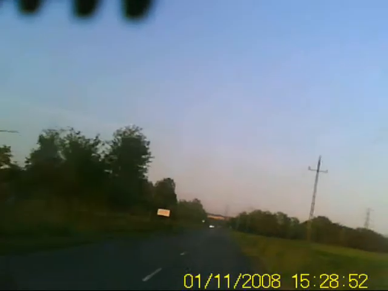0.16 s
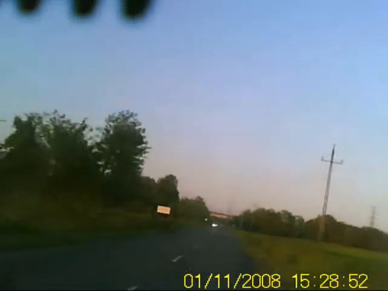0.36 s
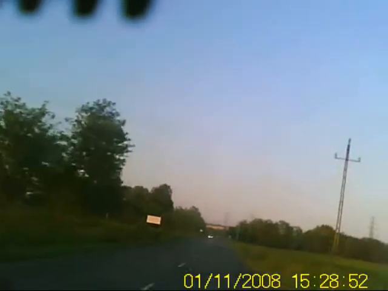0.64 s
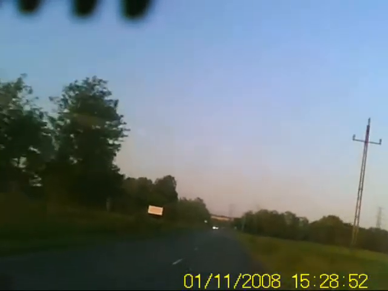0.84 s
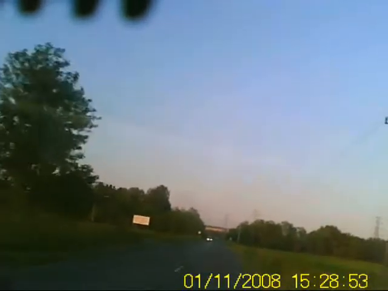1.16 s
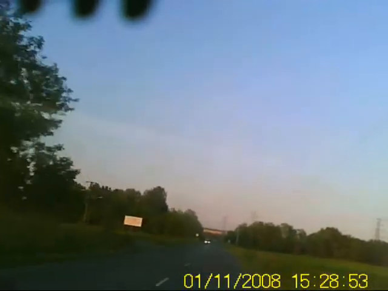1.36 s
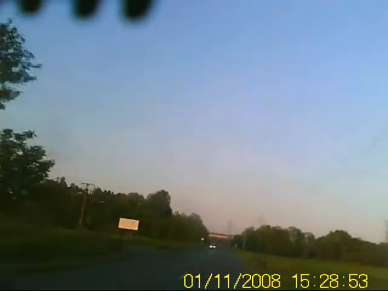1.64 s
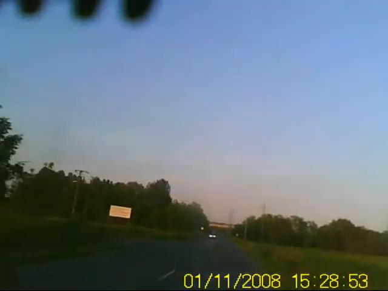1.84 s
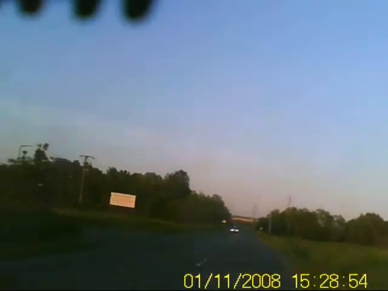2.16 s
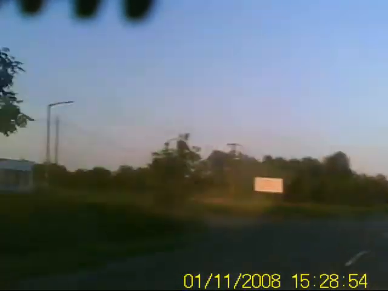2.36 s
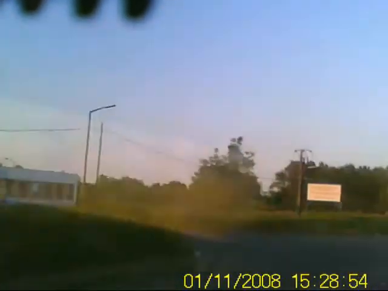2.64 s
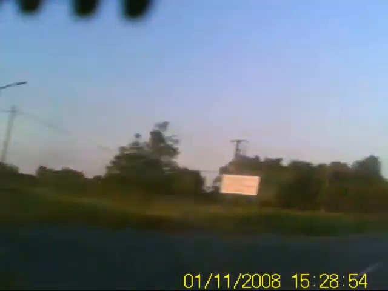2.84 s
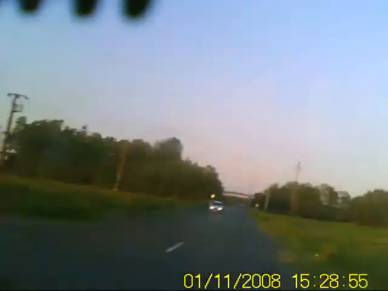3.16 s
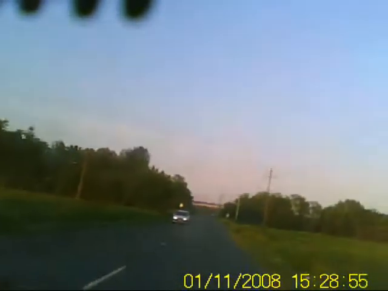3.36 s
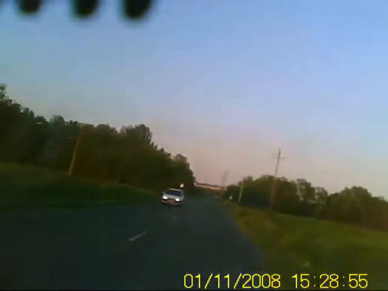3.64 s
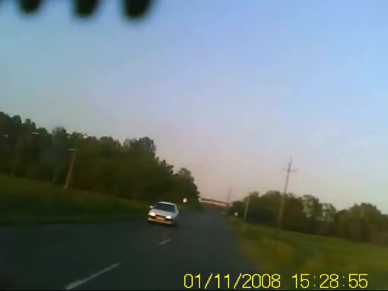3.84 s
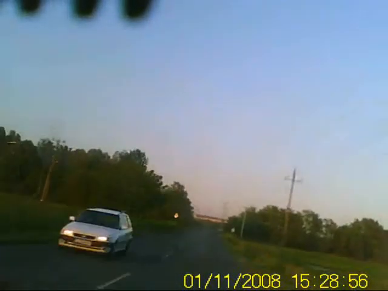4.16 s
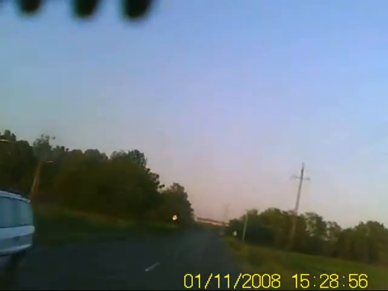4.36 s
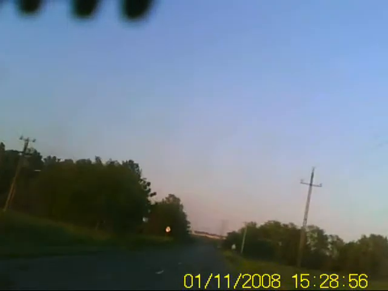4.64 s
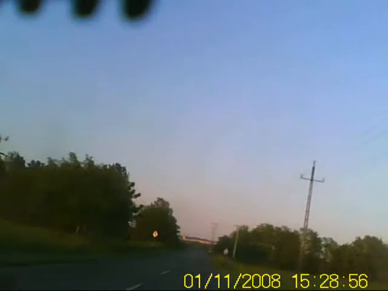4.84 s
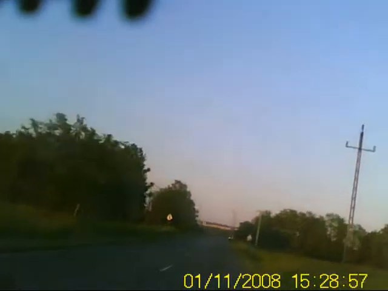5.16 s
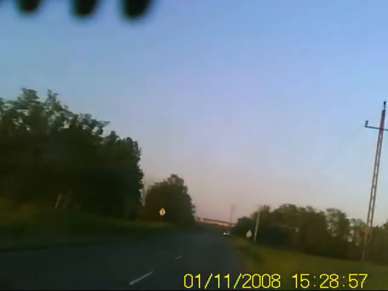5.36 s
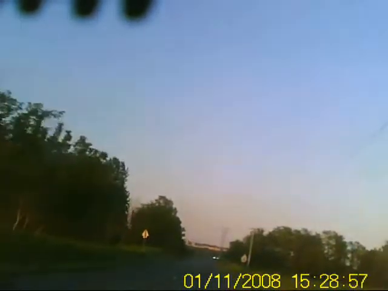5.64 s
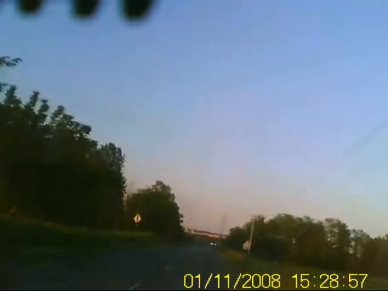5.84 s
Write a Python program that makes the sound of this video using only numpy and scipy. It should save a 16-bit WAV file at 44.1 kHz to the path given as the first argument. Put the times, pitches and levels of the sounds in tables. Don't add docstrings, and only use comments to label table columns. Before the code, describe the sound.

A motorcycle cruises outdoors, heard through a small, rough microphone inside the rider's helmet. Deep wind rumble dominates throughout, with drone, airy roar and faint hiss, and fast clusters of low thumps, about twenty-two a second, that squash and pump everything else. The engine sings steadily around 163 Hz, creeping up to about 168 Hz by 5 s, with a gear whirr and faint constant electronic whine. Low knocks from road joints come at 0.35 and 1.1 s. The engine's upper tone thins near 0.9 s, then strengthens to fullest around 3 s, when a thin valve whistle emerges. A quick roadside roar swells at 2.7 s, followed by a slower hissy one at 3.5 s. A car passes around 4.1 s with a roar that stops abruptly into a gap. Wind lulls near 4.75 s, a short swish follows at 4.9 s, gusts peak at 5.3 s, and another roar rises at the end.

```python
import sys
import numpy as np
from scipy import signal
from scipy.fft import rfft, irfft
from scipy.io import wavfile
from scipy.ndimage import uniform_filter1d

SR = 44100
rng = np.random.default_rng(int(sys.argv[2]) if len(sys.argv) > 2 else 0)


def wav_out(sig):
    wavfile.write(sys.argv[1], SR, np.round(np.clip(np.atleast_2d(sig).T, -1, 1) * 32767).astype(np.int16))


def voltage_ratio(level):
    return 10 ** (np.asarray(level, float) / 20)


N = 264159

# (frequency [Hz], level [dB per Hz])
RUMBLE_COLOUR = [(3, 0), (10, -6), (20, -1), (32, -3.5), (50, -6), (80, -9), (130, -16.5), (200, -23.5),
                 (300, -51.5), (600, -83.5)]
DRONE_COLOUR = [(70, -5.5), (140, -4), (200, 0), (280, -3), (400, -7), (560, -16.5), (900, -38.5),
                (1500, -62.5)]
ROAR_COLOUR = [(200, -19), (500, -3), (800, 1), (1150, -2.5), (1600, -2.5), (2200, -7.5), (2850, -10.5),
               (3500, -21.5), (5000, -42)]
HISS_COLOUR = [(2000, -26), (3200, -3), (4000, -2), (5500, -3.5), (7000, -4), (8500, -3.5), (9600, -8),
               (10400, -14), (11000, -18), (11400, -57)]
ROADSIDE_COLOUR = [(200, -16), (400, 1), (560, 1.5), (750, 0.5), (1000, -9.5), (1400, -14.5), (2500, -66)]
# (time [s], gust [dB])
GUSTS = [(0, -2), (.2, -2.5), (.4, 1), (.6, 2), (.8, -1.5), (1.2, 0), (1.6, 2), (1.9, -2), (2.5, 3),
         (2.9, -1.5), (3.4, 2.5), (4.06, 2), (4.16, -0.5), (4.35, -2), (4.75, -5), (5.3, 3.5), (5.55, -2),
         (5.99, 1)]
# (closest [s], approach [s], leave [s], low roar lift [dB], tyre hiss lift [dB])
PASSES = [
    (1.3, 0.34, 0.17, -1.5, 1),
    (2.7, .2, 0.11, 8.5, 0.1),
    (3.5, 0.54, 0.17, 1, 2),
    (4.11, 0.27, 0.017, 6.5, 3),
    (4.25, 0.11, 0.24, -5.5, 0),
    (4.7, .1, .08, -3, -1.5),
    (4.9, 0.11, 0.092, 2.5, 2.5),
    (5.9, 0.24, .3, 3.5, 2),
]
# (time [s], rate [Hz])
FIRING = [
    (0.0, 162.62),
    (1.5, 163.9),
    (2.0, 164.66),
    (5.0, 168.03),
    (5.99, 167.97),
]
EXHAUST_ORDERS = [1, 2, 3.5, 3.75, 6, 8, 10, 11, 11.25, 21.5, 22]
EXHAUST_DB = [-39, -39.5, -64.5, -64, -78.5, -69, -67.5, -79, -96, -93, -85]
GEAR_ORDERS = [3.6415, 4.344, 6.312, 12.624, 14.566]
GEAR_DB = [-52.5, -72, -60.5, -76, -68.5]
LOAD_ORDERS = [3, 7.283, 22.5]
# (time [s], load [0-1])
THROTTLE = [
    (0, 0.5),
    (.9, .05),
    (1.6, 0.46),
    (2.3, 0.6),
    (2.7, 0.9),
    (3.1, 0.99),
    (3.7, 0.74),
    (4.4, 0.8),
    (5.1, .55),
    (5.99, .58),
]
# (time [s], onset [s], recovery [s], level [dB])
SLACK = [
    (0.05, .3, .45, -15),
    (2.7, 0.51, .22, -17),
    (4.4, 0.23, .3, -1.5),
]
# (time [s], level [dB])
VALVES = [
    (0, -86),
    (2.75, -86),
    (3.05, -73),
    (3.9, -74),
    (4.3, -79),
    (5.99, -81),
]
# (frequency [Hz], level [dB])
WHINES = [(3893, -80), (5599, -77), (6200, -95), (7402, -78), (9598, -93), (10637, -100)]
# (first [s], last [s], first depth [dB], last depth [dB], width [ms])
RUNS = [(0.062, 0.142, -13.5, -20, 8), (0.321, 0.363, -16, -12.5, 5), (0.431, 0.558, -17, -12, 18.4),
        (0.635, 0.759, -18, -17.5, 18), (0.847, 0.935, -8, -16.5, 10.2), (1.019, 1.107, -14.5, -9.5, 13),
        (1.152, 1.238, -16.5, -14.5, 8.7), (1.31, 1.483, -14.5, -14.5, 13), (1.52, 1.646, -18, -10, 15),
        (1.696, 1.753, -11.5, -9.5, 9.9), (1.881, 2.071, -12, -7.5, 11), (2.19, 2.223, -16.5, -20.5, 12),
        (2.476, 2.503, -12.5, -12.5, 6.1), (2.556, 2.59, -18.5, -14.5, 5.6),
        (3.289, 3.335, -17.5, -18.5, 19), (3.982, 4.102, -17.5, -7.5, 10.5), (4.159, 4.205, -12, -15, 11),
        (4.269, 4.393, -11, -16, 8.3), (4.831, 4.93, -11.5, -19.5, 13), (4.961, 5.088, -12, -14, 14),
        (5.258, 5.345, -13, -19, 17), (5.436, 5.568, -18.5, -9.5, 7.5), (5.736, 5.834, -12.5, -15.5, 9.9),
        (5.877, 5.958, -9.5, -17, 7.9)]
# (time [s], depth [dB], width [ms])
STRAYS = [(0.258, -12.5, 4.8), (0.278, -27, 14), (1.808, -12, 24), (2.32, -17, 5.9), (2.386, -21, 11),
          (2.415, -30, 6.8), (2.686, -17, 15), (2.796, -20, 22), (2.848, -15.5, 5.2), (3.014, -20, 11),
          (3.08, -28, 5.2), (3.21, -18, 13), (3.404, -16, 19), (3.431, -9.5, 9.3), (3.461, -12.5, 17),
          (3.501, -15, 29), (3.565, -11.5, 15), (3.637, -23.5, 26), (3.718, -24.5, 13), (3.924, -17, 26),
          (4.512, -21.5, 7.5), (4.643, -16.5, 6.7), (4.747, -15.5, 6.4), (5.185, -14.5, 3.9),
          (5.37, -19, 8.7), (5.63, -15.5, 7.2), (5.659, -15, 6)]
# (time [s], peak [dB], pitch [Hz], time to fall 60 dB [s])
KNOCKS = [
    (0.344, -17, 154, 0.13),
    (1.097, -18.5, 242, 0.13),
    (5.912, -31.5, 278, 0.086),
]


def evened(x):
    return x / np.sqrt(np.mean(x ** 2) + 1e-20)


def curve(rows):
    s, *columns = np.transpose(rows)
    return [np.interp(np.arange(N) / SR, s, c) for c in columns]


def bumps(rows):
    t = np.arange(N) / SR
    total = 0
    for s, before, after, *lift_db in rows:
        swell = np.exp(-0.5 * ((t - s) / np.where(t < s, before, after)) ** 2)
        total = total + np.outer(lift_db, swell)
    return total


def drift(top_hz):
    hz = np.fft.rfftfreq(N, 1 / SR)
    slow = (hz > 0) / (1 + (hz / top_hz) ** 4)
    return evened(irfft(rfft(rng.standard_normal(N)) * slow, N))


def turbulence(colour, size, patchy_db, flicker_db, flicker_hz):
    hz = np.fft.rfftfreq(size, 1 / SR)
    a, b, patches = rng.standard_normal((N * 4 // size + 8, len(hz), 3)).T
    patches = uniform_filter1d(patches, size=8, axis=0)
    patches = evened(uniform_filter1d(patches, size=10, axis=1))
    f, db = np.transpose(colour)
    colour_db = np.interp(np.log(hz + 1), np.log(f + 1), db)[:, None]
    spectra = (a + 1j * b) * voltage_ratio(colour_db + patchy_db * patches)
    x = signal.istft(spectra, nperseg=size, noverlap=size * 3 // 4)[1][size:size + N]
    return evened(x * voltage_ratio(flicker_db * drift(flicker_hz)))


def wind():
    gust_db = curve(GUSTS)[0]
    passing_db, tyres_db = bumps(PASSES)
    rumble_db = -21.5 + 0.93 * gust_db
    drone_db = -32 + 0.17 * gust_db + 0.22 * passing_db
    roar_db = -45.5 + 0.19 * gust_db + 0.5 * tyres_db
    hiss_db = -62 + 0.16 * gust_db + tyres_db
    rumble = turbulence(RUMBLE_COLOUR, size=8192, patchy_db=0.5, flicker_db=1.35, flicker_hz=46.0)
    drone = turbulence(DRONE_COLOUR, size=2048, patchy_db=0.44, flicker_db=1.6, flicker_hz=7.4)
    roar = turbulence(ROAR_COLOUR, size=1024, patchy_db=0.0, flicker_db=0.36, flicker_hz=25.0)
    hiss = turbulence(HISS_COLOUR, size=512, patchy_db=0.8, flicker_db=0.54, flicker_hz=25.0)
    return voltage_ratio(rumble_db) * rumble + voltage_ratio(drone_db) * drone + voltage_ratio(roar_db) * roar + voltage_ratio(hiss_db) * hiss


def tones(turns, orders, levels_db, waver_db, jitter):
    total = 0
    for order, db in zip(orders, levels_db):
        level = voltage_ratio(db + waver_db * drift(32.0)) * np.sqrt(2)
        phase = 2 * np.pi * (order * turns + rng.random()) + jitter * drift(7.3)
        total = total + level * np.sin(phase)
    return total


def engine():
    turns = np.cumsum(curve(FIRING)[0]) / SR
    exhaust = tones(turns, EXHAUST_ORDERS, EXHAUST_DB, waver_db=0.5, jitter=0.06)
    gears = tones(turns, GEAR_ORDERS, GEAR_DB, waver_db=1.1, jitter=0.16)
    third_db = -73 + 23.5 * curve(THROTTLE)[0]
    mesh_db = -59.5 + bumps(SLACK)[0]
    valves_db = curve(VALVES)[0]
    changing = tones(turns, LOAD_ORDERS, [third_db, mesh_db, valves_db], waver_db=1.0, jitter=0.15)
    return exhaust + gears + changing


def whine():
    t = np.arange(N) / SR
    total = 0
    for hz, db in WHINES:
        total = total + voltage_ratio(db + 1.0) * np.sqrt(2) * np.sin(2 * np.pi * hz * t + 0.93 * drift(4.4))
    return total


def roadside():
    level_db = -48 + 0.3 * curve(GUSTS)[0] + bumps(PASSES)[0]
    roar = turbulence(ROADSIDE_COLOUR, size=2048, patchy_db=2.0, flicker_db=0.7, flicker_hz=22.0)
    return voltage_ratio(level_db) * roar


def shed():
    shed_per_s, slip_ms, depth_spread_db, width_spread = 23, 1.0, 0.5, 0.1
    rows = []
    for first, last, first_db, last_db, width_ms in RUNS:
        u = np.linspace(0, 1, round((last - first) * shed_per_s) + 1)
        a, b, c = rng.standard_normal((10, 3))[:len(u)].T
        s = first + u * (last - first) + slip_ms / 1000 * a * (u % 1 > 0)
        depth_db = first_db + u * (last_db - first_db) + depth_spread_db * b
        rows += zip(s, depth_db, width_ms * np.exp(width_spread * c))
    return rows


def buffets():
    rebound, rebound_ms, rebound_wide_ms = 0.65, 20, 7.1
    slow_release = 1.55
    dip_shape = 1.81
    out = np.zeros(N + 6000)
    ms = np.arange(-3000, 3000) * 1000 / SR
    swells = np.exp(-0.5 * ((abs(ms) - rebound_ms) / rebound_wide_ms) ** 2)
    stretch = np.where(ms > 0, slow_release, 1 / slow_release)
    for s, depth_db, width_ms in shed() + STRAYS:
        distance = abs(ms / (width_ms * stretch))
        dip = np.exp(-4 * np.log(2) * distance ** dip_shape / 2 ** (2 - dip_shape))
        thump = voltage_ratio(depth_db) * (rebound * swells - 1.57 * dip)
        part = out[round(s * SR):][:len(ms)]
        part += thump[:len(part)]
    return out[3000:3000 + N]


def knocks():
    out = np.zeros(N + SR)
    t = np.arange(SR // 4) / SR
    soft_start = np.minimum(t / 0.0064, 1)
    for s, db, hz, t60 in KNOCKS:
        ring = voltage_ratio(db - 60 * t / t60) * np.sin(2 * np.pi * hz * t)
        out[round(s * SR):][:len(t)] += soft_start * ring
    return out[:N]


def scene():
    return (wind() + voltage_ratio(3.0) * engine() + whine() + roadside() + buffets() + knocks())[None]


def low_pass(x):
    return signal.sosfilt(signal.butter(12, 15690, fs=SR, output="sos"), x)


def record(dry):
    ceiling, knee = 0.29, 4.24
    squashed = -np.logaddexp(0, knee * (ceiling - 0.09 - dry)) / knee
    squashed = squashed - squashed[:, :1]
    coupled = signal.lfilter(*signal.butter(1, 2.5, "high", fs=SR), squashed) - 0.0085
    noise = turbulence(HISS_COLOUR, size=512, patchy_db=0.5, flicker_db=0.6, flicker_hz=25.0)
    noisy = coupled + voltage_ratio(-68) * noise
    held = np.repeat(noisy[:, ::2], 2, axis=1)[:, :N]
    return low_pass(held)


dry = scene()
out = record(dry)
wav_out(out)
```